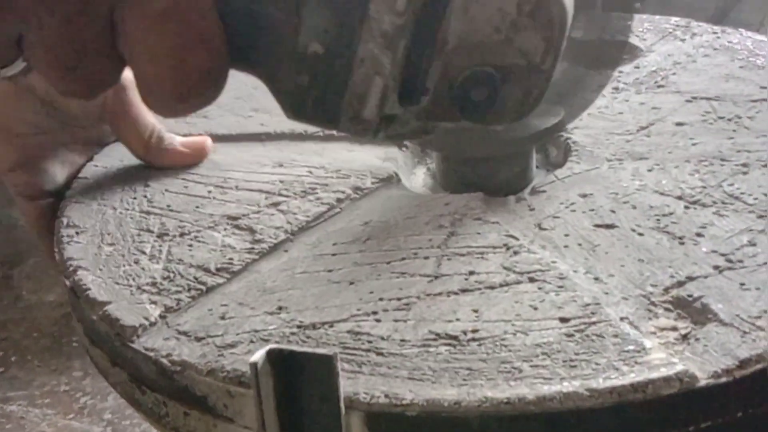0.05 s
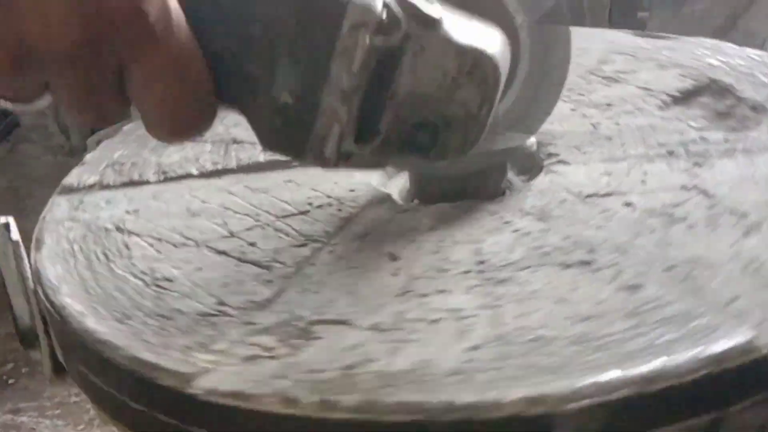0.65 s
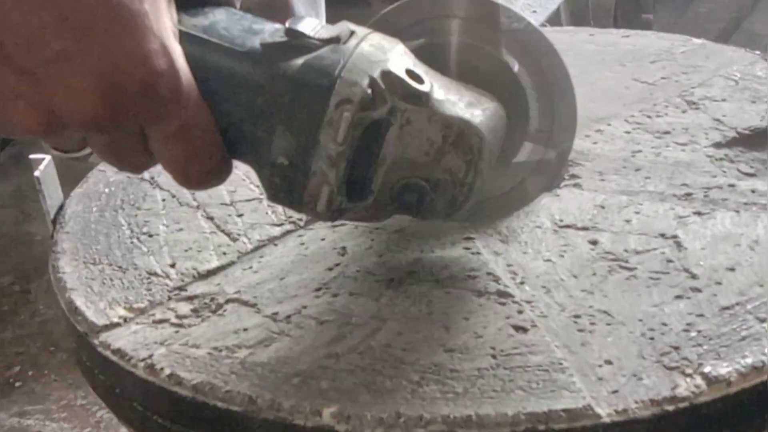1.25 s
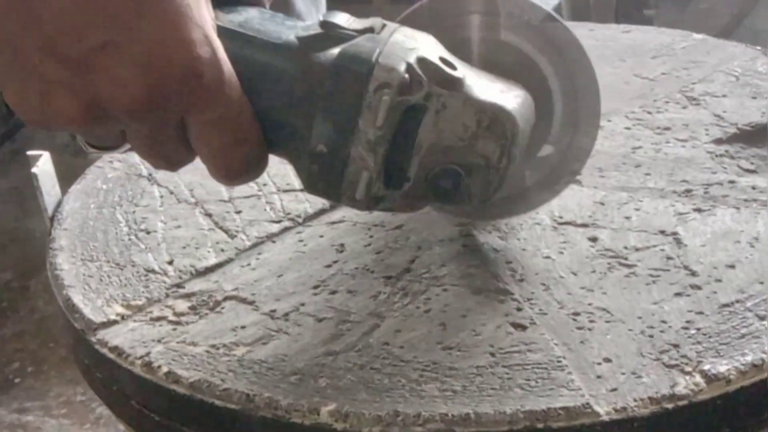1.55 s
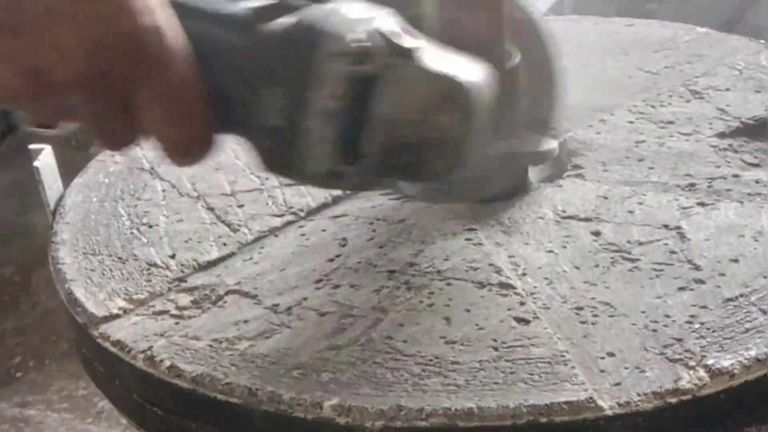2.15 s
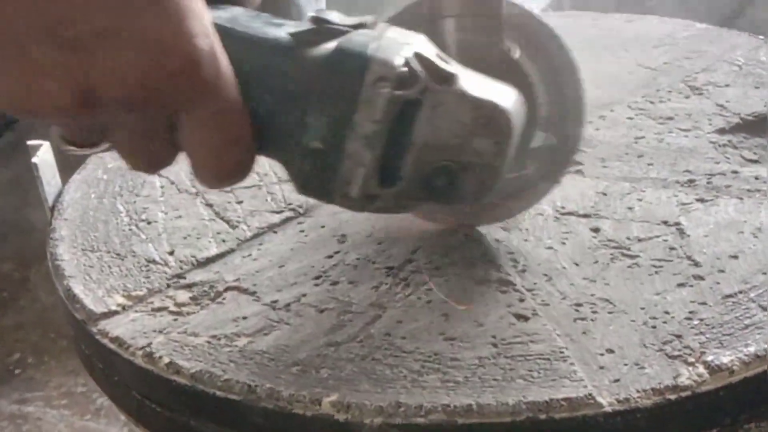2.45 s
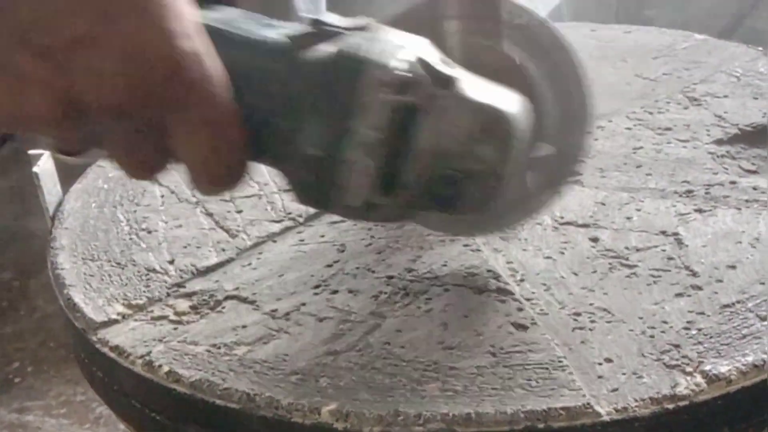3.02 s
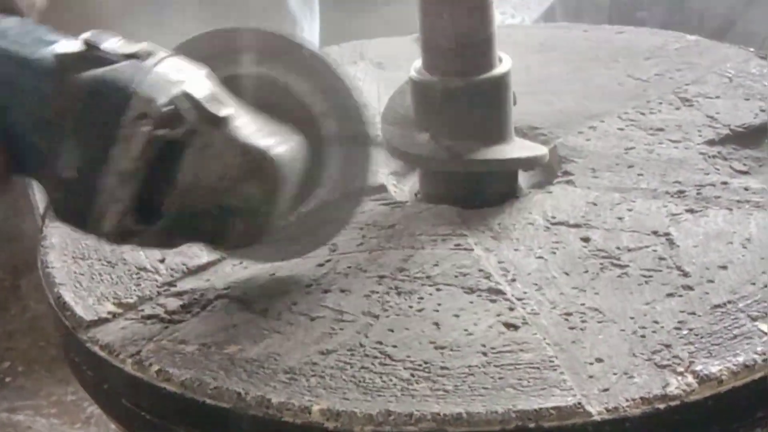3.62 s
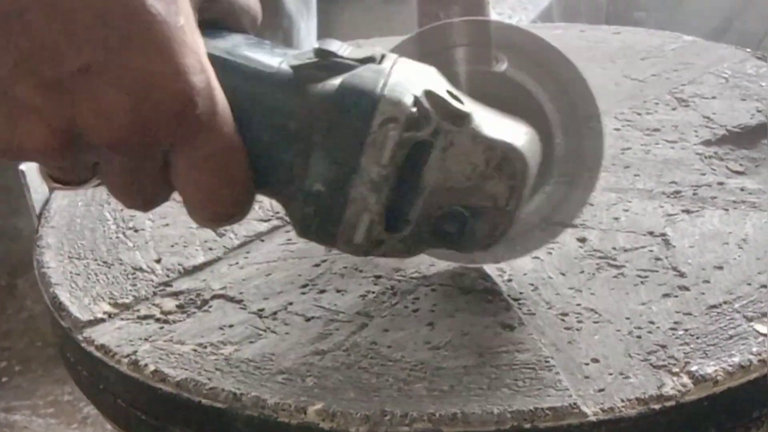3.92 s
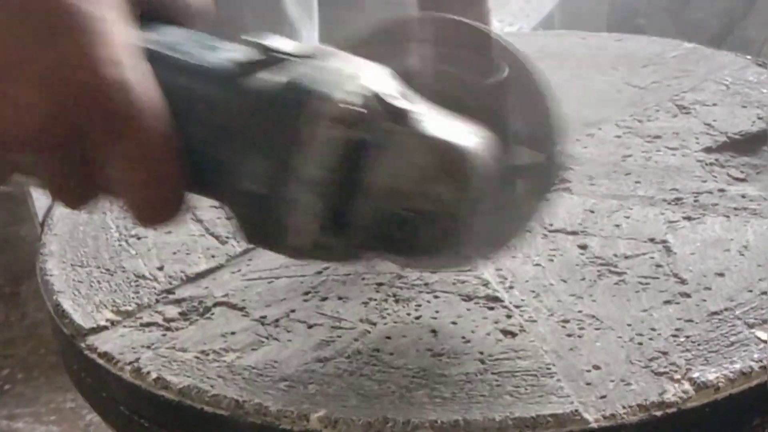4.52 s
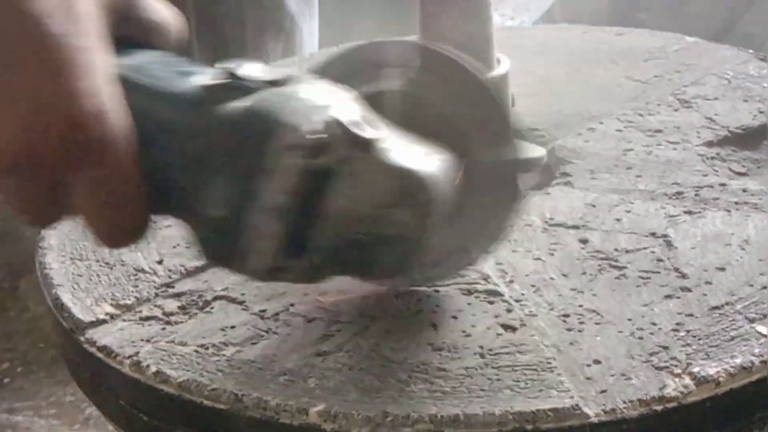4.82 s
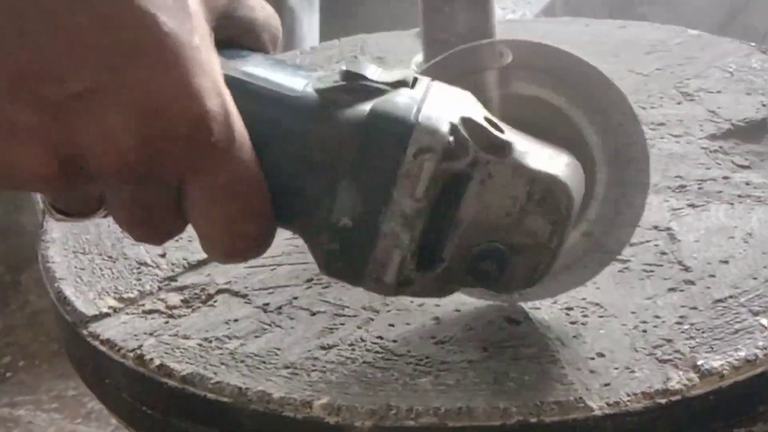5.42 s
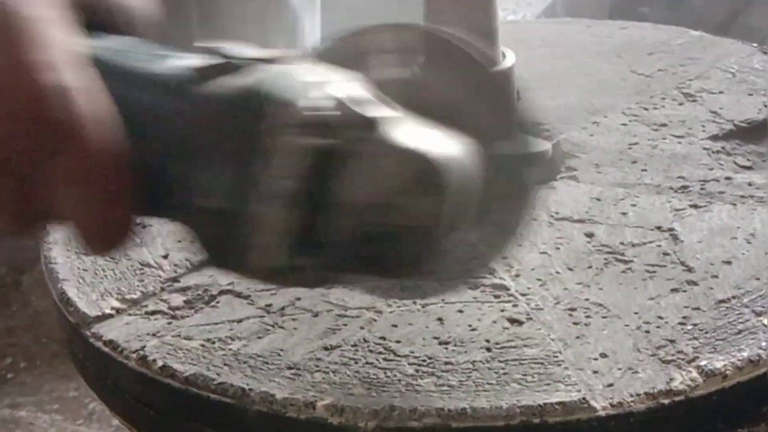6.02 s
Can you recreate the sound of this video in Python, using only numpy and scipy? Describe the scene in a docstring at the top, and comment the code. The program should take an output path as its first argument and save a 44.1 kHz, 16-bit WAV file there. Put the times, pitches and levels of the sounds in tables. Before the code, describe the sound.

Close up in a workshop, a hissing angle grinder bites into a millstone six times with rasping chatter and high metallic squeals.

```python
"""An angle grinder is stroked six times over a millstone, close to the microphone in a workshop.
Once a turn the disc strikes the stone, and impact and friction excite its modes: it chatters, scrapes
and rings. Between strokes the fan hisses, the gears rattle and the armature whines. At first the stone
spins on a rubbing turntable. The draught of the tool buffets the microphone and flying chips tap it;
a gain control lowers the whole sound during each stroke."""
import sys
import numpy as np
from scipy import signal
from scipy.fft import rfft, irfft, next_fast_len
from scipy.io import wavfile
from scipy.ndimage import uniform_filter1d

SR = 44100
rng = np.random.default_rng(int(sys.argv[2]) if len(sys.argv) > 2 else 0)


def dump(signal):
    """Clip the signal to [-1, 1] and save it as 16-bit WAV at the path in sys.argv[1]."""
    limited = np.clip(np.atleast_2d(signal).T, -1, 1)
    pcm = np.round(limited * 32767).astype(np.int16)
    wavfile.write(sys.argv[1], SR, pcm)


N = 276066
TIME = np.arange(N) / SR
GEAR_RATIO = 3.6  # armature turns per turn of the spindle and disc


def amp(db):
    """Amplitude ratio of a level in decibels."""
    return 10 ** (np.asarray(db) / 20)


def unit(x):
    """Normalisation to rms 1."""
    return x / np.sqrt(np.mean(x ** 2) + 1e-20)


def read(points, hz):
    """Interpolation on a logarithmic frequency axis."""
    f, value = np.transpose(points)
    return np.interp(np.log(hz + 1), np.log(f + 1), value)


def curves(rows):
    """Linear interpolation in time: each column of a table at every sample."""
    s, *columns = np.transpose(rows)
    return [np.interp(TIME, s, c) for c in columns]


def add(mix, s, sound):
    """Superposition of a sound on the mix at time s."""
    part = mix[max(round(s * SR), 0):][:len(sound)]
    part += sound[:len(part)]


def noise():
    """White Gaussian noise of rms 1."""
    return rng.standard_normal(N)


def wander(rate_hz):
    """Random fluctuation: low-pass noise of rms 1."""
    size = next_fast_len(N)
    rolloff = 1 + (np.fft.rfftfreq(size, 1 / SR) / rate_hz) ** 4
    return unit(irfft(rfft(noise(), size) / rolloff, size)[:N])


def colour(x, spectrum):
    """Spectral shaping of a white signal at constant power."""
    size = next_fast_len(N)
    gain = unit(amp(read(spectrum, np.fft.rfftfreq(size, 1 / SR))))
    return irfft(rfft(x, size) * gain, size)[:N]


def ring(x, modes, order=1):
    """Forced response of damped modes; order 2 has steeper flanks and neighbours in antiphase."""
    t = np.arange(4096) / SR
    response = 0
    for k, (hz, width, db) in enumerate(modes):
        mode = unit(t ** (order - 1) * np.exp(-np.pi * width * t) * np.sin(2 * np.pi * hz * t))
        response += (-1) ** (k * (order - 1)) * amp(db) * mode
    return signal.oaconvolve(x, response / np.sqrt(len(t)))[:N]


def grains(per_s, spread_db):
    """Shot noise: random clicks of uneven size, rms 1."""
    return unit(noise() * (rng.random(N) < per_s / SR) * amp(spread_db * noise()))


def once_a_turn(turns, length, uneven_db, jitter):
    """Envelope of quasi-periodic impacts, one a turn; decay length and jitter are in turns."""
    turn = turns.astype(int)
    strength, timing = rng.standard_normal((1024, 2))[turn].T
    delay = np.clip(jitter * (1.76 + timing), 0, .5)
    age = np.maximum(turns - turn - delay, 0) / length
    return unit(np.minimum(5 * age, 1) * np.exp(-age) * amp(uneven_db * np.clip(strength, -2, 1)))


# Rotation rate of the unloaded armature: t/s, f/Hz
FREE_SPEED = [(0, 284), (.3, 287.5), (1.65, 288), (3.15, 284.5), (4.6, 287), (4.76, 281.5), (5.3, 287),
              (5.52, 280.5), (6.26, 287)]

def armature_turns(drag, sag_hz=7, tremble=.001):
    """Rotation is the integral of speed, which sags under load and trembles slightly."""
    speed = curves(FREE_SPEED)[0] - sag_hz * drag
    return np.cumsum(speed * (1 + tremble * wander(24.5))) / SR


# The running tool: t/s, fan level/dB, gear level/dB, whine level/dB
TOOL_LEVELS = [(0, -24.5, -26.5, -54), (.55, -26, -25, -58), (.9, -27, -34, -58), (2.3, -27, -30.5, -55),
               (4.6, -28, -32, -51), (6.26, -27, -28, -51.5)]
# Spectrum of the fan: f/Hz, level/dB
FAN_SPECTRUM = [(100, -37), (550, -16), (850, -8.5), (1170, -5), (1330, -12), (1600, -7), (1850, -9),
                (2600, 2.5), (4100, -2.5), (4800, 6.5), (5700, 4), (6150, -3.5), (8000, -19),
                (12000, -13.5), (15500, -21.5)]

def fan(turns, throb=.059):
    """Broadband air noise, amplitude-modulated at the rotation rate of the armature."""
    fan_db, _, _ = curves(TOOL_LEVELS)
    air = noise() * (1 + throb * np.cos(2 * np.pi * turns))
    return colour(air, FAN_SPECTRUM) * amp(fan_db + .5 * wander(59))


# Resonances of the gears: f/Hz, bandwidth/Hz, level/dB
GEAR_MODES = [(2623, 170, -5.5), (3040, 530, -12), (3467, 240, -3.5)]

def gears(turns, level_db=-2.5, uneven_db=3.5):
    """Tooth impacts excite resonances, most strongly at one point of the spindle's turn."""
    _, gears_db, _ = curves(TOOL_LEVELS)
    teeth = grains(per_s=3000, spread_db=2.5)
    swing = unit(1.5 + .66 * once_a_turn(turns / GEAR_RATIO, length=.59, uneven_db=8.5, jitter=.077))
    return ring(teeth * swing * amp(gears_db + level_db + uneven_db * wander(55)), GEAR_MODES, order=2)


# Partials of the armature whine: harmonic number
WHINE_HARMONICS = [5, 6, 7, 11, 15, 17, 18]
# Strength of each partial: level/dB
WHINE_LEVELS = [-1.5, 2.5, -3, 11, 12, 5, 12]

def whine(turns, drag, waver_db=1.5, load_db=-3, hum_order=10, hum_db=-60, hum_load_db=9):
    """Harmonics of rotation: load weakens the armature's whine and strengthens the spindle's hum."""
    _, _, whine_db = curves(TOOL_LEVELS)
    armature = sum(amp(db + waver_db * wander(4)) * np.sin(2 * np.pi * k * turns)
                   for k, db in zip(WHINE_HARMONICS, WHINE_LEVELS))
    hum = np.sin(2 * np.pi * hum_order * turns / GEAR_RATIO) * amp(hum_db + hum_load_db * drag)
    return np.sqrt(2) * (armature * amp(whine_db + load_db * drag) + hum)


# Rubbing as the stone is spun and stopped: t/s, level/dB
SPIN_LEVELS = [(0, -52), (.55, -52), (.75, -63), (.95, -63), (1.2, -87)]
# Resonances of the turntable: f/Hz, bandwidth/Hz, level/dB
TURNTABLE_MODES = [(1137, 110, 5), (2400, 57, -8)]

def turntable():
    """Friction in the bearing under the stone excites two resonances."""
    return ring(noise() * amp(curves(SPIN_LEVELS)[0]), TURNTABLE_MODES, order=2)


# Reverberation time of the workshop: f/Hz, T60/s
ROOM_DECAY = [(200, 0.04), (2000, 0.35), (6000, 0.24), (15000, 0.031)]

def workshop(x, wet_db=-14):
    """Reverberation: a diffuse tail follows the direct sound, each band decaying at its own rate."""
    hz, t, bands = signal.stft(rng.standard_normal(SR // 2), SR, nperseg=256)
    decay = amp(-60 * t / read(ROOM_DECAY, hz)[:, None]) * (t > .005)
    _, tail = signal.istft(bands * decay, SR, nperseg=256)
    return x + amp(wet_db) * signal.fftconvolve(x, tail / np.linalg.norm(tail))[:N]


# Puffs of air on the microphone: t/s, level/dB
AIR_PUFFS = [(0.692, -29.5), (1.073, -41), (2.33, -44), (2.77, -32), (4.645, -34), (6.036, -33),
             (6.107, -36.5)]
# Spectrum of the draught: f/Hz, level/dB
DRAUGHT_SPECTRUM = [(20, -40), (45, -14), (75, -0.5), (150, 0.5), (300, -5.5), (500, -15), (1000, -21),
                    (3000, -54)]

def draught(level_db=-44, lumpy_db=4.5, puff_s=.0066):
    """Turbulence: air from the fan and disc buffets the microphone with low-frequency pressure."""
    puffs = sum(amp(db) * np.exp(-.5 * ((TIME - s) / puff_s) ** 2) for s, db in AIR_PUFFS)
    pressure = noise() * (amp(level_db + lumpy_db * np.minimum(wander(44), 2)) + puffs)
    return colour(pressure, DRAUGHT_SPECTRUM)


# Strokes over the stone: t/s, duration/s, then level/dB of scrape, chatter, first tone, second tone
DISC_STROKES = [(1.743, 0.52, -30.5, -22.5, -21.5, -22.5), (2.444, .56, -29, -20.5, -21.5, -25),
                (3.225, 0.57, -30, -20.5, -25, -24), (3.985, 0.56, -29.5, -20.5, -22.5, -23),
                (4.761, .54, -29.5, -21, -24.5, -24.5), (5.52, 0.54, -30.5, -21, -22.5, -23.5)]

def contact(levels_db, light_db=0, linger_s=0, land_s=.00078, settle_s=.1, lift_s=.13):
    """Contact envelope, one level a stroke: a sudden light landing, rising pressure, a gentle lift."""
    gain = 0
    for (start, length, *_), db in zip(DISC_STROKES, levels_db):
        t = np.maximum(TIME - start, 0)
        touch = np.clip(t / land_s, 0, 1) * np.clip((length + linger_s - t) / lift_s, 0, 1)
        gain += touch * amp(db + light_db * np.exp(-t / settle_s))
    return gain


def load(lag_s=.09):
    """Inertia of the armature smooths the drag of the stone (0-1) as a first-order lag."""
    pole = np.exp(-1 / (lag_s * SR))
    return signal.lfilter([1 - pole], [1, -pole], contact(np.zeros(len(DISC_STROKES))))


def skipping(turns, skip_s=.11, depth=.48):
    """Rebound: after landing, the disc hops every second turn, then settles into steady contact."""
    loose = sum((TIME > start) * np.exp(-((TIME - start) / skip_s) ** 2) for start, *_ in DISC_STROKES)
    hops = once_a_turn(turns / GEAR_RATIO / 2, length=.22, uneven_db=5, jitter=.081)
    return 1 + depth * np.minimum(loose, 1) * (hops - 1)


# Modes of the disc and its guard: f/Hz, bandwidth/Hz, level/dB
BODY_MODES = [(2520, 280, -8), (2740, 240, -9.5), (2950, 260, -2.5), (3425, 220, -.5), (3585, 150, -8.5),
              (4215, 190, -10), (4480, 140, -5.5)]
# Faint high modes of the disc: f/Hz, bandwidth/Hz, level/dB
HIGH_MODES = [(7210, 50, -15), (8750, 150, -22), (9378, 70, -16), (10085, 100, -15), (11160, 130, -15),
              (12930, 180, -21), (14020, 100, -20), (15400, 90, -21)]
# Spectrum of dragged grit: f/Hz, level/dB
GRIT_SPECTRUM = [(300, -15), (1800, -2), (2400, 6.5), (4000, 6.5), (5500, -31), (7800, -41), (8900, -15),
                 (9700, 0.5), (11400, 4), (12000, -8), (12800, 1), (13400, -9), (14300, 2), (15400, -2.5)]

def grinding(turns, grit_db=5.5, bite_grit_db=-17, high_db=5, bumpy_db=1.02):
    """Impact and friction: the rim's high spot strikes once a turn; dragged grit rings the high modes."""
    _, _, scrape_db, chatter_db, _, _ = np.transpose(DISC_STROKES)
    bumps = amp(bumpy_db * wander(25)) * skipping(turns)  # the uneven face of the stone
    scrape = contact(scrape_db, light_db=-2) * bumps
    chatter = contact(chatter_db, light_db=-6, linger_s=.0012) * bumps
    blows = once_a_turn(turns / GEAR_RATIO, length=.26, uneven_db=2, jitter=.065)
    knocks, grip = bites()
    friction = unit(1 + .41 * blows) * scrape * grip ** .15
    body = ring(noise() * unit(blows + .35) * grip * chatter + knocks, BODY_MODES, order=2)
    crackle = grains(per_s=20000, spread_db=2.1) * friction * amp(grit_db)
    grit = colour(crackle + knocks * amp(bite_grit_db), GRIT_SPECTRUM)
    return body + grit + ring(noise() * friction * amp(high_db), HIGH_MODES)


# Knocks of the disc on ridges of the stone: t/s, level/dB
RIDGE_BITES = [(1.756, -4), (1.8687, -6), (2.0971, -3.5), (2.1735, -15), (2.4645, -1.5), (2.592, 0),
               (2.9504, -7), (3.2249, -3), (3.2894, -8), (3.4795, -3), (3.7319, -7.5), (3.9895, -3),
               (4.1298, -5), (4.375, -1), (4.8109, -5), (5.5434, -6), (5.5968, 1.5)]

def bites(ridge_db=-7, rise_s=.0008, clear_s=.01):
    """Fracture: bursts of force at ridges and where chips break off. Returns force and the disc's grip."""
    force, grip = np.zeros(N), np.ones(N)
    age = np.arange(1200) / SR / rise_s
    burst = age * np.exp(1 - age)
    for s, db in RIDGE_BITES:
        add(force, s, amp(db + ridge_db) * burst)
        grip *= 1 - .85 * np.exp(-((TIME - s + clear_s / 2) / clear_s) ** 4)  # skips clear just before
    for s, db, _ in FLYING_CHIPS:
        add(force, s - rise_s, amp(db) * burst)
    return force * noise(), grip


# The four strongest tones of the steel disc: f/Hz, bandwidth/Hz
DISC_TONES = [(5299, 20), (5766, 15), (6500, 18), (7132, 18)]
# Moments when one tone sings out: t/s, f/Hz, level/dB
DISC_SQUEALS = [(1.765, 5766, -29), (1.83, 5299, -18), (1.845, 5766, -15.5), (1.98, 5299, -17),
                (2.035, 5766, -17), (2.47, 5299, -23), (2.51, 5299, -18), (2.77, 5766, -16),
                (2.86, 5766, -21), (3.395, 5766, -19), (3.6, 5766, -20), (4.003, 5299, -26),
                (4.205, 5766, -17.5), (4.315, 5299, -16), (4.96, 5299, -14), (5.175, 5299, -17),
                (5.935, 5299, -16.5), (5.935, 5766, -17)]

def singing(turn_hz=19, stutter_db=2.9, drift_hz=5, rough=.14, squeal_s=.02, kick_db=-12.5, kick_s=.0063):
    """Friction-excited vibration: the disc's tones stutter and squeal; the upper ones outlast the touch."""
    *_, first_db, second_db = np.transpose(DISC_STROKES)
    kicks = sum((TIME > s) * amp(db + kick_db) * np.exp(-abs(TIME - s) / kick_s) for s, db in RIDGE_BITES)
    gains = [np.hypot(contact(first_db, light_db=-7), kicks),  # each bite kicks the lowest tone
             contact(second_db, light_db=-16, linger_s=.01),
             contact([-33] * len(DISC_STROKES), light_db=-4, linger_s=.035),
             contact([-35] * len(DISC_STROKES), light_db=-.5, linger_s=.048)]
    out = 0
    for gain, (hz, width) in zip(gains, DISC_TONES):
        tone = ring(noise(), [(hz, width, 0)])
        tone /= np.sqrt(abs(uniform_filter1d(tone ** 2, size=400)) + .3)  # evens out the envelope
        drift = np.exp(2j * np.pi * np.cumsum(drift_hz * wander(rate_hz=19)) / SR)
        stutter = amp(stutter_db * np.minimum(wander(rate_hz=19), 1))
        squeal = sum(amp(db) * np.exp(-((TIME - s) / squeal_s) ** 2)
                     for s, pitch, db in DISC_SQUEALS if pitch == hz)
        unsteady = (signal.hilbert(tone) * drift).real * (1 + rough * wander(rate_hz=110))
        out += unit(unsteady) * np.hypot(gain * stutter, squeal)
    return out


# The larger chips that hit the microphone: t/s, level/dB, dullness (0-1)
FLYING_CHIPS = [(1.838, -14.5, 0.76), (1.873, -14, 0.4), (2.465, -12.5, 0.1), (2.48, -15, 0.5),
                (2.515, -14.5, 0.26), (2.541, -12, 0.25), (2.614, -12, 0.53), (2.632, -18, 1),
                (2.654, -11, 0.66), (2.67, -12, 0.6), (2.682, -16, 0.9), (3.229, -11.5, 0.22),
                (3.344, -14, .6), (3.368, -16.5, 0.65), (3.383, -16, 0.84), (3.483, -16, 0.8),
                (3.534, -18, 0.6), (3.989, -21, 0.2), (4.052, -15.5, 0.75), (4.106, -13, 0.62),
                (4.234, -18, 0), (4.259, -15.5, 0.75), (4.379, -11.5, 0.62), (4.953, -10, 0),
                (4.961, -11, 1), (4.969, -11.5, 0.84), (5.028, -18, 0.8), (5.087, -13.5, 0.58),
                (5.601, -23.5, 0.95)]

def chips(tap_s=.00015, push_s=.0017, tap_db=17, push_db=8):
    """Impact on the microphone: each chip gives a sharp tap and a slower push of pressure."""
    out, t = np.zeros(N), np.arange(1200) / SR
    tap, push = ((1 - t / length) * np.exp(-t / length) for length in (tap_s, push_s))
    for s, db, dull in FLYING_CHIPS:
        pulse = (1 - dull) * amp(tap_db) * tap + dull * amp(push_db) * push
        add(out, s, amp(db) * rng.choice([-1, 1]) * pulse)
    return signal.sosfilt(signal.butter(3, [70, 1500], "band", fs=SR, output="sos"), out)


# Brief whistles of the disc: t/s, half duration/s, f/Hz, level/dB
DISC_WHISTLES = [(5.816, .05, 771, -37.5), (5.976, 0.074, 1740, -39)]

def whistles():
    """Tone bursts: each whistle is a sinusoid under a Gaussian envelope."""
    return np.sqrt(2) * sum(amp(db) * np.exp(-((TIME - s) / half) ** 2) * np.sin(2 * np.pi * hz * TIME)
                            for s, half, hz, db in DISC_WHISTLES)


def scene():
    """Superposition: one rotation drives motor and disc; both channels carry the same sound."""
    drag = load()
    turns = armature_turns(drag)
    tool = fan(turns) + gears(turns) + whine(turns, drag) + grinding(turns) + singing() + whistles()
    mono = workshop(tool + turntable()) + chips() + draught()
    return np.array([mono, mono])


def record(dry, threshold_db=-25, slope=.33, follow_s=.034, ceiling=.7, band_hz=(45, 15600)):
    """Compression lowers everything during a stroke; soft clipping and band limiting follow."""
    pole = np.exp(-1 / (follow_s * SR))
    level_db = 10 * np.log10(signal.lfilter([1 - pole], [1, -pole], dry[0] ** 2) + 1e-12)
    ducked = dry * amp(-slope * np.maximum(level_db - threshold_db, 0))
    rounded = ducked / (1 + (ducked / ceiling) ** 6) ** (1 / 6)
    highpass = signal.butter(1, band_hz[0], "high", fs=SR, output="sos")
    lowpass = signal.firwin(1201, band_hz[1], window=("kaiser", 9), fs=SR)
    return signal.oaconvolve(signal.sosfilt(highpass, rounded), lowpass[None], "same", axes=1)


dry = scene()
out = record(dry)
dump(out)
```